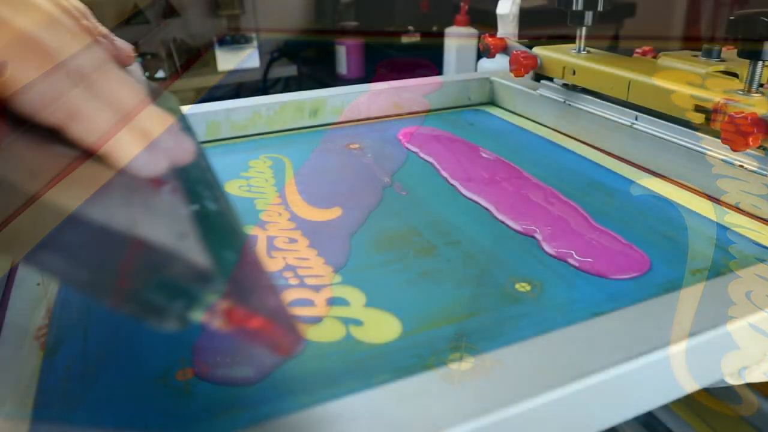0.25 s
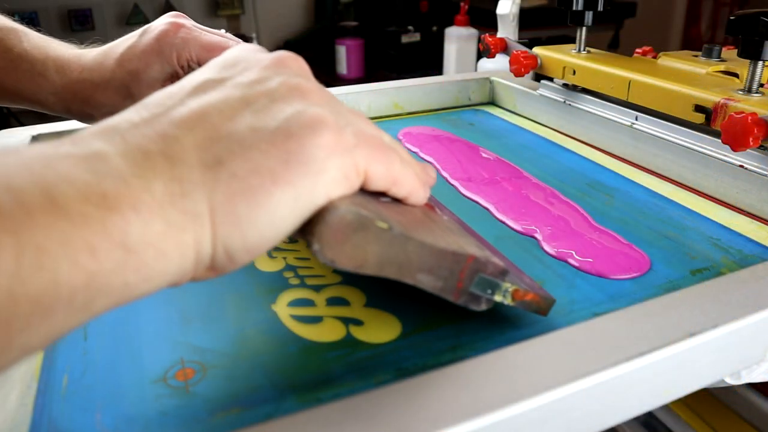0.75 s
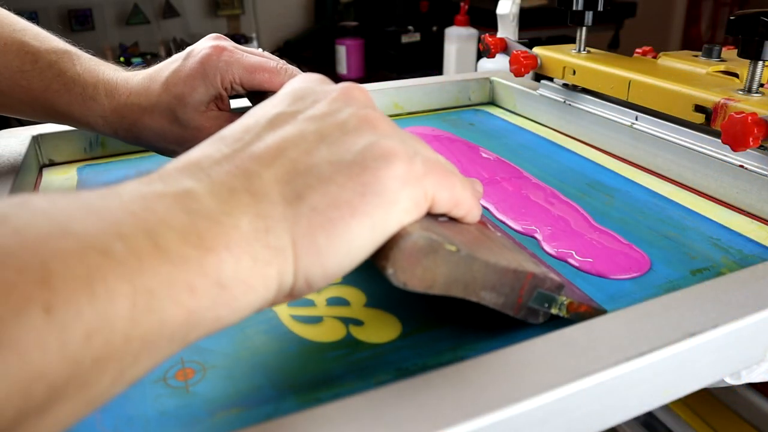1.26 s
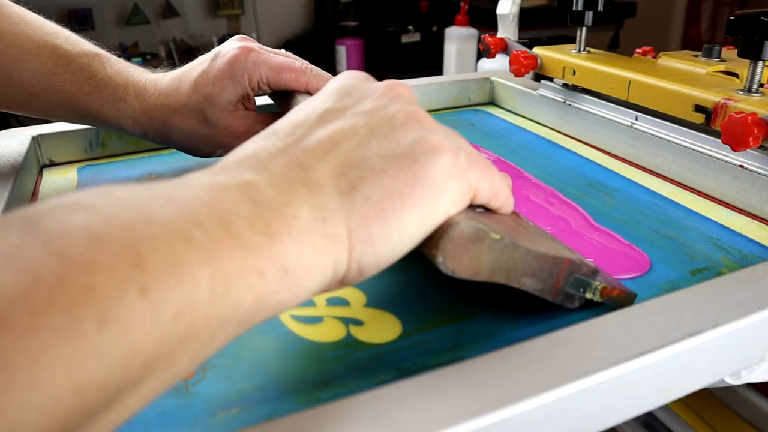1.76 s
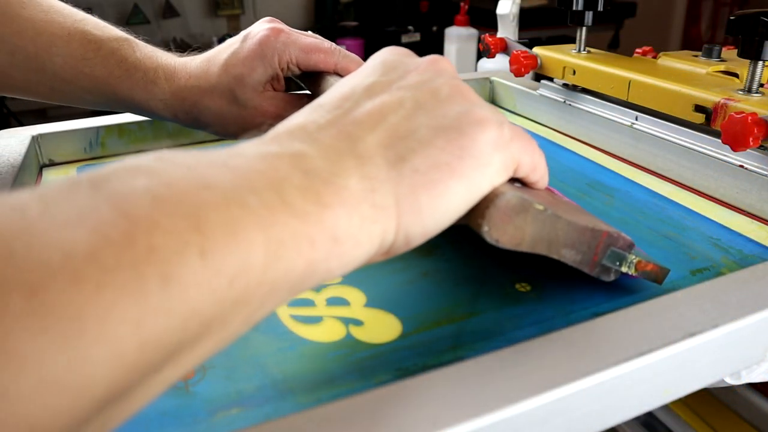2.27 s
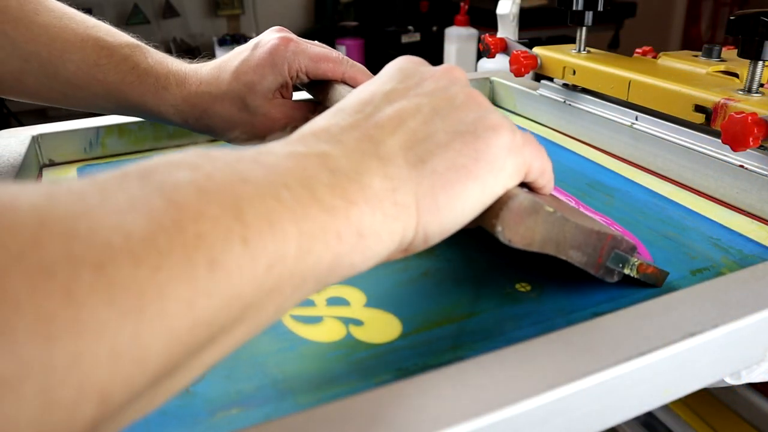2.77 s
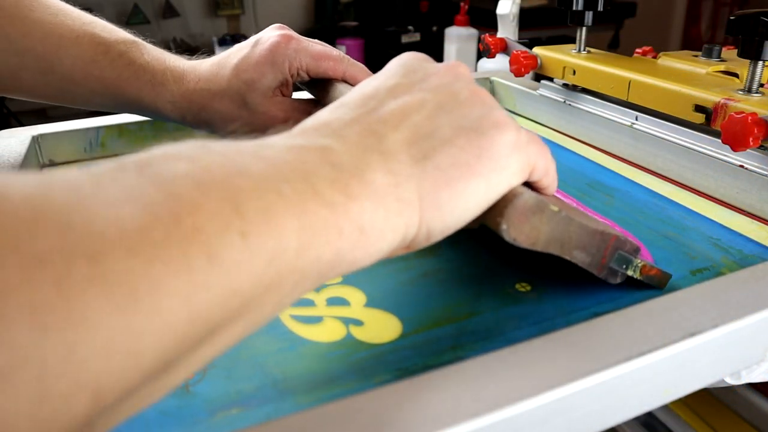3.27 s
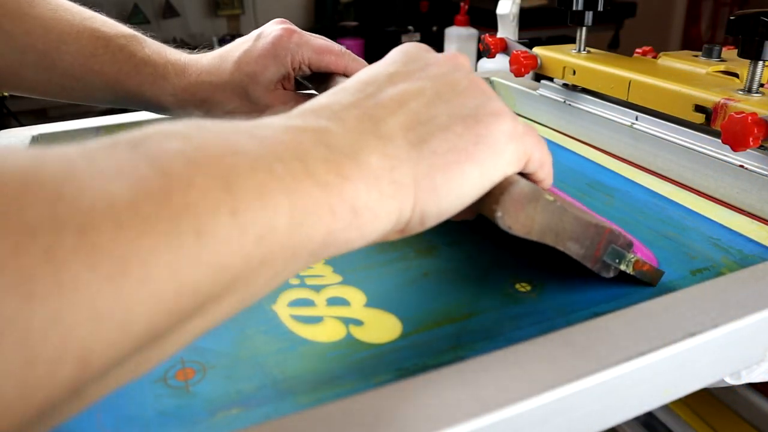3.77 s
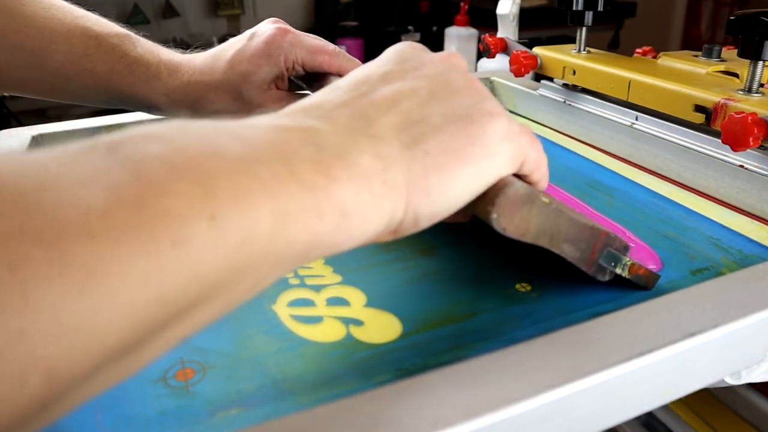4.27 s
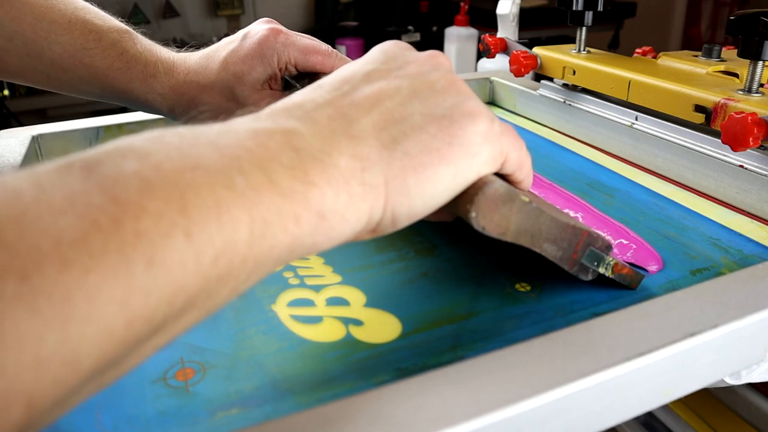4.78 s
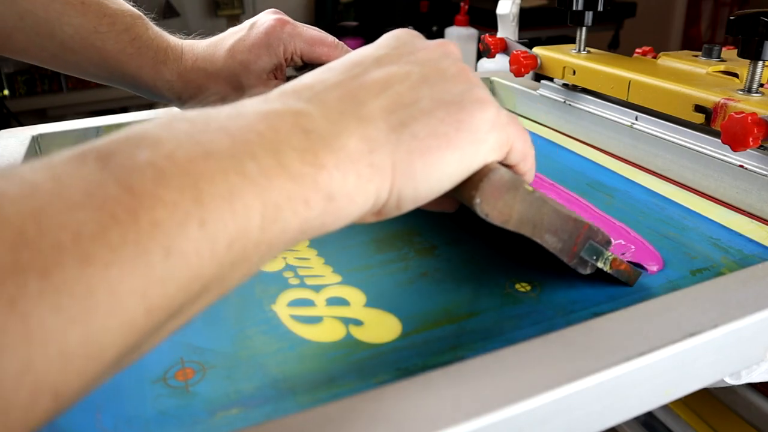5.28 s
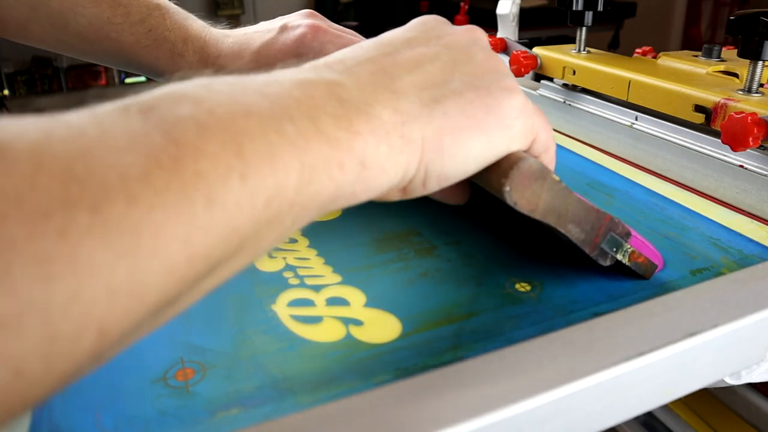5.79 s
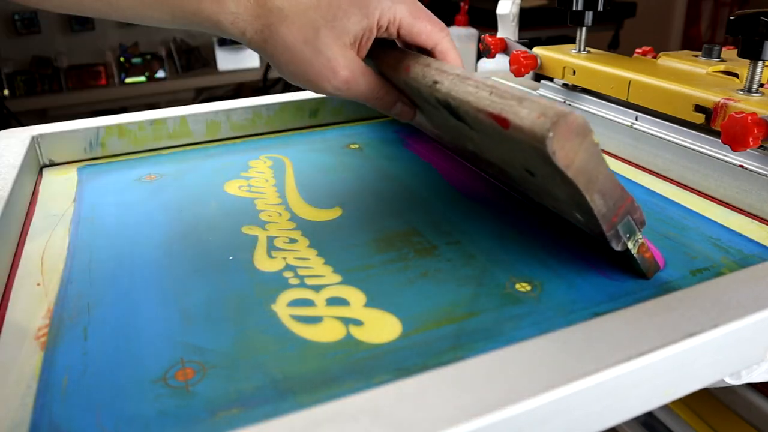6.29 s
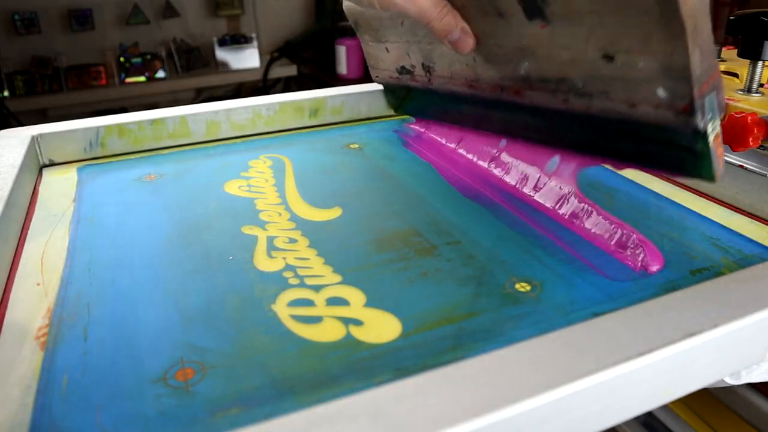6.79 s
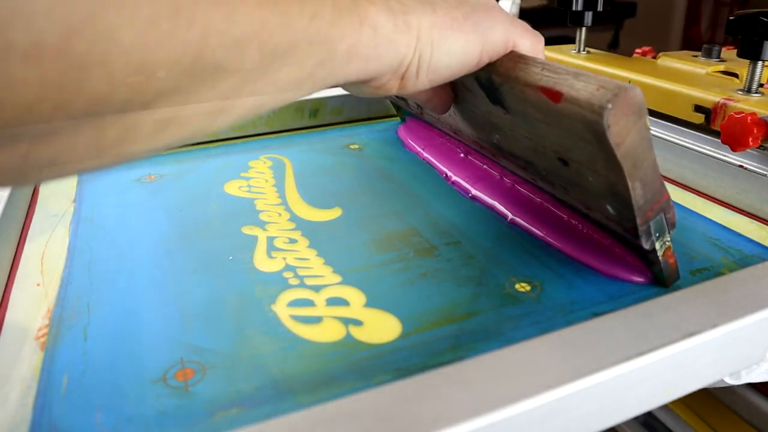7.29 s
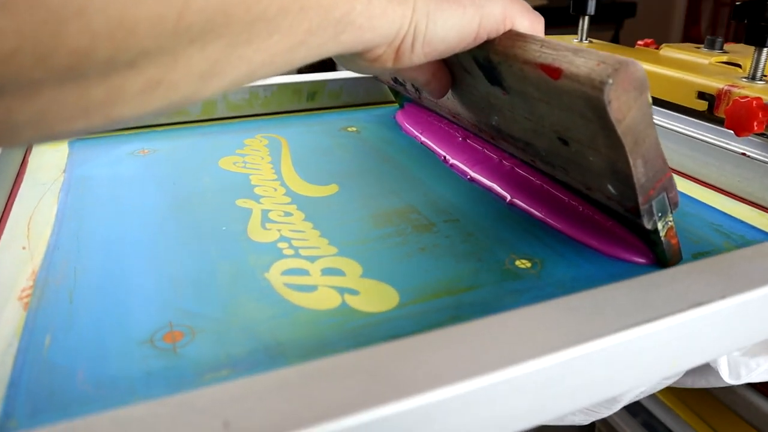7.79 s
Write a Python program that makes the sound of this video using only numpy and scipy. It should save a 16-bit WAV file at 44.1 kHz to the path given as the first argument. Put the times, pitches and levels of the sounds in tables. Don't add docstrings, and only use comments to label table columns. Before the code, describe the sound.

Close to the microphone, faint handling and light taps come first, then a rubber squeegee makes one long, slow scrape over a taut mesh, its squeak rising. Five shorter squeaky strokes follow, each preceded by sharp clacks and a drummy thud. A low juddering push, hand rubs, sticky ink peeling and a final clack with a brief wet drag finish it. The small workshop hums very softly.

```python
import sys
import numpy as np
from scipy import signal
from scipy.fft import rfft, irfft, next_fast_len
from scipy.io import wavfile
from scipy.ndimage import uniform_filter1d, map_coordinates

SR = 44100
rng = np.random.default_rng(int(sys.argv[2]) if len(sys.argv) > 2 else 0)


def rack_gain(trim_db):
    fader = np.asarray(trim_db, float)
    return 10 ** (fader / 20)


def master_out(mix):
    frames = np.transpose(np.atleast_2d(mix))
    ceiling = np.clip(frames, -1, 1)
    pcm = np.round(ceiling * 32767).astype(np.int16)
    wavfile.write(sys.argv[1], SR, pcm)


N = 354740


def unit(x):
    return x / np.sqrt(np.mean(x ** 2) + 1e-20)


def along(points, hz):
    f, v = np.transpose(points)
    return np.interp(np.log(hz + 1), np.log(f + 1), v)


def curves(tables):
    t = np.arange(N) / SR
    gate = np.zeros(N)
    for rows in tables:
        first, last = rows[0][0], rows[-1][0]
        gate += np.interp(t, [first - .004, first + .004, last - .01, last + .01], [0, 1, 1, 0])
    s, *cols = np.vstack(tables).T
    values = [np.interp(t, np.sort(s), c) for c in cols]
    return [uniform_filter1d(c, size=260) for c in [np.minimum(gate, 1)] + values]


def wobble(rate_hz):
    coarse = np.arange(0, N + 32, 32)
    knots = rng.standard_normal(int(N * rate_hz / SR) + 4)
    return np.interp(np.arange(N), coarse, map_coordinates(knots, [coarse * rate_hz / SR]))


def filtered(x, response):
    m = 2 * next_fast_len(N // 2 + SR // 4)
    return irfft(rfft(x, m) * response(np.fft.rfftfreq(m, 1 / SR)), m)[..., :N]


def modes(table, widen=1, flip=-1):
    def response(f):
        total = 0
        for k, (centre, width, db) in enumerate(table):
            damping = 1j * f * width * widen
            total = total + flip ** k * rack_gain(db) * damping / (centre * centre - f * f + damping)
        return total
    return response


def causal(points, gain_db):
    def response(f):
        c = irfft(np.maximum(along(points, f) + gain_db, -120) * np.log(10) / 20)
        half = len(c) // 2
        c = c * np.interp(np.arange(len(c)), [0, 1, half - 1, half, half + 1], [1, 2, 2, 1, 0])
        return np.exp(rfft(c))
    return response


def noise(response, patchy_db, throb=1):
    z = signal.stft(rng.standard_normal(N), nperseg=256)[2]
    field = uniform_filter1d(uniform_filter1d(rng.standard_normal(z.shape), 4, 0), 8, 1)
    grains = signal.istft(z * rack_gain(patchy_db * unit(field)), nperseg=256)[1][:N]
    return unit(filtered(throb * grains, response))


def swell(start, rise, hold, peak_db, depth_db, fade, drop_db=0):
    roundness, drop_s = 1.37, 0.016
    t = np.arange(N) / SR - start
    after = np.maximum(t - rise - hold, 0)
    climb = depth_db * np.clip(1 - t / rise, 0, 1) ** roundness
    level = peak_db - climb - fade * after - drop_db * np.minimum(after / drop_s, 1)
    return np.where(t < 0, -160, np.maximum(level, -160))


def pressure(tables):
    gate, level_db = curves(tables)
    return level_db + 20 * np.log10(np.abs(gate) + 1e-5)


# pitch_hz, level_db_per_hz
AIR_SPECTRUM = [(15, -57.5), (25, -28), (86, -6), (173, -2.5), (209, -4), (253, -8.5), (289, -4),
                (399, -9.5), (3720, -32.5), (4260, -32), (5420, -33.5), (7490, -34.5), (15500, -42)]


def workshop_air():
    drift_db = 1.2 * wobble(1.656)
    return rack_gain(-65 + drift_db) * noise(lambda f: rack_gain(along(AIR_SPECTRUM, f)), patchy_db=2.0)


# pitch_hz, t60_s
ROOM_DECAY = [(150, 0.56), (500, 0.34), (2000, 0.37), (10000, 0.35)]


def workshop_echo(x):
    hz, t, z = signal.stft(rng.standard_normal(SR // 2), SR, nperseg=256)
    decay = rack_gain(-60 * t / along(ROOM_DECAY, hz)[:, None])
    tail = signal.istft(z * decay, SR, nperseg=256)[1]
    late = np.pad(x, (500, 0))
    return signal.fftconvolve(late, tail / np.linalg.norm(tail))[:N]


# start_s, rise_s, hold_s, level_db, fade_db_per_s
TOUCHES = [
    [(0, 0.001, 0.068, -60.5, 110), (.135, 0.0058, .002, -61, 42), (.636, .006, .002, -59.5, 430)],
    [(.355, 0.045, 0.064, -52.5, 302)],
    [(.516, 0.0077, .002, -61, 140), (.7, 0.058, .002, -65, 212), (6.0, .03, .03, -64.5, 60),
     (6.08, 0.054, 0.063, -67, 100), (6.47, 0.051, .002, -66, 152), (6.592, 0.013, 0.0018, -55, 800),
     (6.61, 0.0071, 0.0019, -66, 71)],
    [(5.654, 0.1, .08, -62, 200)],
    [(5.82, 0.04, .045, -55.5, 239), (5.93, 0.019, 0.02, -60, 166)],
    [(6.24, 0.023, 0.012, -56, 168), (6.305, 0.032, 0.025, -56.5, 298)],
    [(6.868, 0.059, .02, -72, 298)],
    [(6.927, 0.0084, 0.031, -51, 189), (7.0, 0.027, .02, -70.5, 71)],
    [(7.176, 0.083, 0.063, -57, 179)],
]
# pitch_hz, width_hz, level_db
GRIP_MODES = [
    [(635, 380, 2), (1270, 370, 1.5), (2165, 280, 5), (3950, 380, -5), (5240, 740, -11.5),
     (8600, 1200, -14.5)],
    [(624, 340, -8.5), (1320, 89, 6), (1790, 220, -1), (2210, 84, 7.5), (3700, 250, -6.5), (4510, 250, -11),
     (5150, 370, -17), (8820, 900, -23)],
    [(416, 280, -2), (800, 230, 10), (1370, 500, 4), (2270, 470, 0), (3570, 580, -7.5), (5570, 980, -11.5),
     (8320, 1100, -18), (11900, 480, -35)],
    [(1160, 300, -5.5), (2380, 170, 0.5), (3220, 180, -4.5), (5690, 250, -7.5), (8100, 500, -15),
     (11360, 700, -27), (13500, 710, -24)],
    [(1350, 151.5, 4), (1870, 130, 1.5), (2330, 150, 1), (2663, 83, -5.5), (3160, 200, -5),
     (4430, 340, -10), (5400, 318, -10.5), (7700, 390, -12), (8600, 400, -10), (11900, 900, -29),
     (13600, 1300, -29)],
    [(700, 1400, -20), (1290, 210, 1), (2500, 82, -1), (4030, 110, 10.5), (5820, 340, -2), (7800, 390, -1),
     (9250, 310, -8.5), (12500, 2700, -21)],
]
# pitch_hz, width_hz, level_db
PEEL_MODES = [
    [(1740, 65, -3), (3360, 66, 2), (3880, 70, -2), (5400, 92, -8), (6870, 90, -8), (9590, 76, -5.5),
     (11400, 100, -16), (13300, 180, -20)],
    [(720, 400, -2), (1670, 150, 2), (2090, 150, 4), (3790, 230, -2.5), (5450, 300, 7), (6000, 200, 5.5),
     (6420, 300, 4), (7760, 370, 4), (8500, 300, 4.5), (9270, 560, 1.5), (10630, 600, -9),
     (12400, 900, -4.5), (13800, 1600, -7.5)],
    [(684, 660, -1.5), (1700, 170, 2), (1980, 120, -1), (3420, 60, -9), (4400, 110, -7), (5190, 120, 0),
     (5790, 74, 2.5), (6560, 150, -9), (7200, 120, -8.5), (7970, 130, -2.5), (8450, 200, -10),
     (9650, 350, -8.5), (11900, 230, -10.5), (13600, 400, -24)],
]


def hands_and_peeling_ink():
    out = np.zeros(N)
    for touches, table in zip(TOUCHES, GRIP_MODES + PEEL_MODES):
        gestures = [swell(s, rise, hold, db, 12.5, fade) for s, rise, hold, db, fade in touches]
        level_db = np.max(gestures, axis=0) + 0.6 * wobble(55)
        peaks, skirts = modes(table), modes(table, widen=5.0, flip=1)
        grain = noise(lambda f: np.abs(peaks(f)) + rack_gain(-23) * np.abs(skirts(f)), patchy_db=2.5)
        out += rack_gain(level_db) * grain
    return out


# start_s, level_db, mesh_thud_db, table_thump_db
CONTACTS = [(0.177, -41, -11, -16), (0.545, -40.5, -22, -32), (0.641, -37.5, -31, -34),
            (0.755, -41.5, -17, -21), (1.183, -37.5, 4, -33), (2.497, -54, 4, -28), (2.528, -28, -11, -49),
            (3.073, -30, -6, -43), (3.102, -35, 0, -15), (3.135, -21.5, 2.5, -41), (3.147, -19, 8, -25),
            (3.576, -29, 0, -42), (3.634, -37.5, -7, -17), (3.668, -22.5, -7, -33), (3.677, -17, 6, -18.5),
            (3.929, -26, -1, -43), (4.122, -34.5, -5, -22), (4.168, -48, 20.5, 4.5),
            (4.227, -15, 3.5, -21.5), (4.498, -26.5, 4, -33), (4.725, -27, -5, -24),
            (5.348, -28, -5.5, -22), (5.421, -26, 11, -44), (5.443, -34, -3, -42), (5.808, -36, -16, -23),
            (6.508, -35, -0.5, -37), (6.562, -46, 3, -28), (6.599, -30.5, -40, -33), (7.701, -24, -7, -43),
            (7.711, -40, -4, -48), (7.722, -24, 9, -26)]
# pitch_hz, level_db_per_hz
CRACK_SPECTRUM = [(290, -16), (500, -3.5), (726, -3.5), (1530, -9.5), (2160, -20), (3300, -24.5),
                  (4920, -36.5), (5400, -36.5), (12000, -59), (15600, -94.5), (22000, -120)]
# pitch_hz, width_hz, level_db
DRUM_MODES = [(199, 32, -16.5), (318.2, 8.9, 4), (404.5, 25, -5), (478, 10, 0), (596, 230, -13),
              (930, 41, -13.5)]


def contacts():
    crack, thump, blows = np.zeros(N + SR), np.zeros(N + SR), np.zeros(N)
    t = np.arange(SR // 4) / SR
    for s, db, thud_db, thump_db in CONTACTS:
        start = round(s * SR)
        grit = rng.standard_normal(len(t)) + 1.64 * np.exp(-t / .00005)
        crack[start:][:len(t)] += rack_gain(db - 60 * t / 0.044) * grit
        table = np.sin(2 * np.pi * 66 * t) * (1 - np.exp(-t / 0.01))
        thump[start:][:len(t)] += rack_gain(db + thump_db - 1.5 - 60 * t / 0.21) * table
        blows[start] = rack_gain(db + thud_db + 39.5)
    drum = modes(DRUM_MODES, widen=1.6)
    crack = filtered(crack[:N], causal(CRACK_SPECTRUM, gain_db=5.5))
    thud = filtered(blows, lambda f: drum(f) / (1 + 1j * f / 500) ** 2)
    thump = filtered(thump[:N], lambda f: f ** 4 / (f ** 4 + 52 ** 4))
    return crack, thud, thump


# pitch_hz, width_hz, level_db
DAMPED_MESH = [(305, 140, 2), (495, 200, 2), (760, 303, -1), (1200, 466, -7), (1840, 350, -15.5)]


def scrape(hiss_db, spectrum, throb, hiss_gain_db, drum_db, steady):
    hiss = noise(lambda f: rack_gain(along(spectrum, f)), patchy_db=2.0, throb=throb)
    top = filtered(hiss, lambda f: f ** 4 / (f ** 4 + 3800 ** 4))
    hiss -= top * (1 - rack_gain(np.minimum(0, hiss_db + 55.0)))
    swing_db = steady * np.clip(-44.5 - hiss_db, -10, 30) + 0.57 * wobble(30)
    drum = noise(modes(DAMPED_MESH), patchy_db=3.5) * rack_gain(drum_db + swing_db)
    return rack_gain(hiss_db) * (rack_gain(hiss_gain_db) * hiss + drum)


# start_s, level_db
FLOOD_PRESSURE = [
    [(7.46, -74), (7.49, -62), (7.52, -52), (7.568, -45), (7.698, -38.5), (7.706, -27), (7.73, -46.5),
     (7.782, -58), (7.95, -77.5)],
]
# pitch_hz, level_db_per_hz
WET_SPECTRUM = [(530, 4.5), (900, -12), (1560, 9.5), (1880, 11), (2510, 9), (3620, 8), (6650, -2.5),
                (8440, -2), (10600, -18.5), (14100, -15), (15500, -35.5)]


def flood_scrape():
    throb = rack_gain(0.52 * wobble(220))
    return scrape(pressure(FLOOD_PRESSURE), WET_SPECTRUM, throb, hiss_gain_db=1.5, drum_db=2, steady=0.048)


# pitch_hz, level_db_per_hz
LOADED_SPECTRUM = [(400, -20.5), (1000, -3.5), (2000, -7.5), (3500, -20), (6000, -30.5), (8500, -36.5),
                   (10200, -82.5), (15500, -91)]


def heavy_scrape(push_db, jolts):
    throb = rack_gain(8 * np.cos(jolts) + 3.2 * wobble(150))
    rasp = scrape(push_db, LOADED_SPECTRUM, throb, hiss_gain_db=8.0, drum_db=16.5, steady=0.03)
    return filtered(rasp, lambda f: 1 / (1 + (f / 9000) ** 8))


# pitch_hz, level_db_per_hz
THREAD_SPECTRUM = [(590, -50.5), (1000, 2), (1290, -4.5), (1430, -8.5), (1860, -5.5), (2810, -14),
                   (5330, -23), (5980, -20.5), (6780, -29.5), (8240, -26), (10700, -47), (13600, -48),
                   (15500, -52.5)]


def thread_scrape(press_db, slips):
    throb = 1 + 0.071 * np.cos(slips)
    return scrape(press_db, THREAD_SPECTRUM, throb, hiss_gain_db=5.0, drum_db=3.5, steady=0.61)


# start_s, level_db
PUSH_PRESSURE = [
    [(5.4, -80.5), (5.416, -70), (5.424, -65), (5.47, -55), (5.52, -49.5), (5.57, -41), (5.594, -48),
     (5.602, -66), (5.71, -78), (5.74, -83)],
]


def push_pressure():
    return pressure(PUSH_PRESSURE)


# start_s, level_db
LONG_PRESSURE = [
    [(1.175, -103), (1.186, -75), (1.21, -67.5), (1.404, -54), (1.76, -50.5), (2.056, -46.5), (2.14, -49),
     (2.168, -76), (2.3, -105)],
]
# start_s, rise_s, hold_s, level_db, start_below_db
SHORT_STROKES = [
    (2.55, 0.16, 0.057, -47, 31),
    (3.125, 0.19, 0.017, -41.5, 20.5),
    (3.645, 0.12, 0.1, -43, 20.5),
    (4.151, 0.12, 0.14, -46, 40.5),
    (4.767, 0.15, 0.097, -46.5, 36),
]


def stroke_pressure():
    strokes = [pressure(LONG_PRESSURE)]
    for row in SHORT_STROKES:
        strokes.append(uniform_filter1d(swell(*row, fade=217.5, drop_db=10.5), size=200))
    return np.max(strokes, axis=0)


def squeak(tables, octave_db, fall_db, waver, flutter_db, uneven):
    gate, rate_hz, tone_db = curves(tables)
    phase = 2 * np.pi * np.cumsum(rate_hz * (1 + waver * wobble(120))) / SR
    levels = [tone_db] + [octave_db - np.maximum(fall_db, 3) * k for k in range(7)]
    tone = np.zeros(N)
    for k, db in enumerate(levels):
        flutter = flutter_db * (1 + k / 5) * wobble(55)
        tone += rack_gain(db + flutter) * np.cos((k + 1) * phase)
    return np.sqrt(2) * gate * tone * (1 + uneven * wobble(25) * np.cos(phase / 2)), phase


# start_s, slip_rate_hz, tone_db
JUDDER_SLIPS = [
    [(5.426, 372.1, -31), (5.438, 346.3, -29), (5.45, 332.2, -19), (5.478, 287.2, -24), (5.49, 337, -21.5),
     (5.505, 361.8, -20), (5.52, 406.3, -20), (5.545, 350.3, -23), (5.573, 250, -27), (5.595, 261, -28)],
]


def heavy_judder(push_db):
    bite_db = np.maximum(-35, push_db + 14)
    judder, jolts = squeak(JUDDER_SLIPS, bite_db, fall_db=4.0, waver=.06, flutter_db=2.5, uneven=.6)
    drum = modes(DRUM_MODES, widen=3.0, flip=1)
    return filtered(judder, lambda f: (0.44 + 0.32 * drum(f)) * f ** 2 / (f ** 2 + 130 ** 2)), jolts


# start_s, slip_rate_hz, tone_db
NEAR_LONG_SLIPS = [
    [(1.19, 180, -48), (1.228, 177.5, -45.5), (1.324, 199.2, -39), (1.355, 195, -60)],
    [(1.5, 180, -47), (1.58, 211.6, -41.5), (1.724, 219.3, -33), (1.79, 257.8, -34.5),
     (1.898, 396.5, -31.5), (1.952, 411.6, -36.5), (2.08, 447.9, -30.5), (2.138, 367.2, -32),
     (2.17, 354.8, -41.5)],
]
# start_s, slip_rate_hz, tone_db
NEAR_SLIPS = [
    [(2.56, 198.5, -68), (2.61, 316, -37.5), (2.668, 467, -34.5), (2.69, 541.3, -45), (2.718, 492, -24.5),
     (2.76, 476.6, -37), (2.81, 305, -35)],
    [(3.17, 355.7, -50), (3.182, 405.7, -38.5), (3.236, 684, -28), (3.275, 706.4, -25.5),
     (3.316, 684, -50.5), (3.33, 596, -25), (3.38, 301, -27.5)],
    [(3.68, 426.6, -20.5), (3.698, 501.3, -32.5), (3.728, 563, -31), (3.8, 634.4, -34.5),
     (3.838, 602, -30.5), (3.866, 400.7, -22), (3.9, 139.4, -37.5)],
    [(4.225, 483.7, -18), (4.249, 532.6, -37), (4.265, 524.3, -20), (4.315, 620, -34), (4.34, 625, -27.5),
     (4.388, 592.5, -25.5), (4.412, 451.4, -21), (4.45, 160.1, -34.5)],
    [(4.8, 147.4, -39), (4.822, 218.9, -44.5), (4.882, 475, -30.5), (4.9, 537.4, -33.5),
     (4.92, 470.7, -32.5), (4.988, 472, -29.5), (5.02, 458, -34), (5.06, 305.5, -36.5)],
]
# start_s, slip_rate_hz, tone_db
FAR_SLIPS = [
    [(1.37, 293.7, -54), (1.38, 288.6, -38), (1.458, 325, -48), (1.47, 313.7, -69)],
    [(1.78, 243.2, -40), (1.884, 249, -40.5), (1.916, 273.6, -52), (1.935, 288, -28), (1.98, 322.8, -25.5),
     (2.06, 461.8, -31), (2.102, 446.7, -36), (2.15, 366.4, -43)],
    [(2.7, 586, -32), (2.73, 583, -31.5), (2.766, 515, -39), (2.78, 495, -25.5)],
    [(3.24, 714, -31), (3.256, 739, -33.5), (3.288, 756, -25), (3.3, 786, -42)],
    [(3.72, 566.5, -35), (3.764, 702.2, -37.5), (3.81, 854.3, -29.5), (3.838, 766, -31),
     (3.862, 564.2, -29), (3.885, 340, -22)],
    [(4.165, 167.1, -53), (4.181, 200.3, -45), (4.225, 289.5, -31.5)],
    [(4.9, 534, -48), (4.912, 540.7, -30), (4.97, 594.6, -33), (5.0, 592, -62)],
]
# start_s, near_octave_over_hiss_db, far_octave_over_hiss_db,
# near_loss_per_overtone_db, far_loss_per_overtone_db
SLIP_SHAPE = [(1.3, 6.5, -19, 7, 7), (1.7, 8.5, 14, 4.5, 3.7), (1.9, 7, 8.5, 2.5, 3),
              (2.05, 6, 5.5, 5.5, 5.14), (2.62, 5.5, -5, -2, 5), (2.7, 18, 3, 8.5, 5),
              (2.76, 6.5, 1, 4.5, 5.1), (3.19, 18, -2, 13, 6.5), (3.25, 14, 1, 5.5, 6.1),
              (3.31, 9, 4, 7.5, 4.4), (3.7, 4, -4, 1.5, 8.3), (3.78, -7, 0, 2, 9.1), (3.84, -2.5, 5, 4, 10),
              (4.25, 11.5, 14, 7, 3.1), (4.33, 5.5, 10, 4, 3.5), (4.41, 7, 10, 5, 4.15),
              (4.88, 10.5, -8, 6.5, 6.27), (5.0, -4.5, -19, 13, 7)]
# pitch_hz, width_hz, level_db
EDGE_MODE = [(3320, 2400, -2.5)]


def blade_squeaks(press_db):
    _, near_db, far_db, near_fall_db, far_fall_db = curves([SLIP_SHAPE])
    edge_db = -46.5 + 1.02 * (press_db + 46.5)
    near, slips = squeak(NEAR_LONG_SLIPS + NEAR_SLIPS, edge_db + near_db, near_fall_db,
                         waver=.01, flutter_db=2.6, uneven=.04)
    far, _ = squeak(FAR_SLIPS, edge_db + far_db, far_fall_db, waver=.01, flutter_db=2.6, uneven=.04)
    drum, edge = modes(DRUM_MODES, flip=1), modes(EDGE_MODE)

    def body(f):
        return (0.67 + 0.81 * drum(f) + 0.15 * edge(f)) * f ** 2 / (f ** 2 + 150 ** 2)
    return filtered(near + far, body), slips


def scene():
    press_db, push_db = stroke_pressure(), push_pressure()
    squeaks, slips = blade_squeaks(press_db)
    judder, jolts = heavy_judder(push_db)
    blade = squeaks + judder
    rasp = thread_scrape(press_db, slips) + heavy_scrape(push_db, jolts) + flood_scrape()
    rasp = filtered(rasp, lambda f: f ** 2 / (f ** 2 + 110 ** 2))
    crack, thud, thump = contacts()
    echo = workshop_echo(rack_gain(-8.0) * blade + rack_gain(-8.5) * (crack + thud) + rack_gain(-12.5) * rasp)
    close = blade + crack + thud + thump + rasp + hands_and_peeling_ink()
    return (close + echo + workshop_air())[None]


def low_pass(x):
    return signal.sosfilt(signal.butter(12, 15630, fs=SR, output="sos"), x)


def record(dry):
    mix = filtered(dry, lambda f: f < 15700)
    return low_pass(mix)


dry = scene()
out = record(dry)
master_out(out)
```